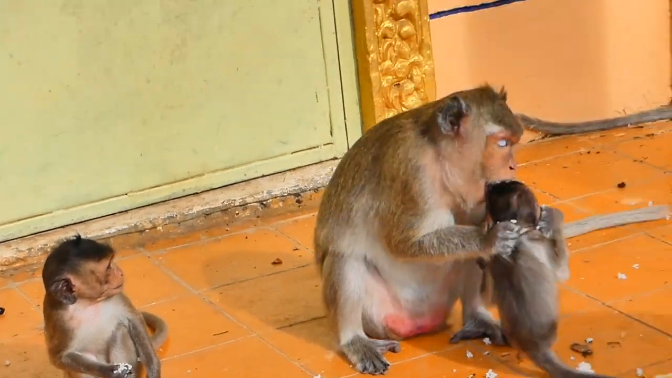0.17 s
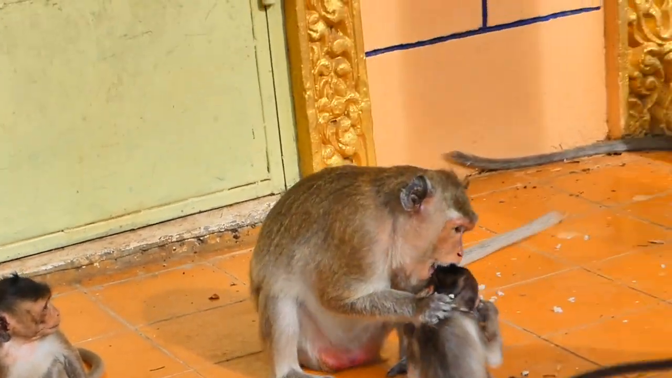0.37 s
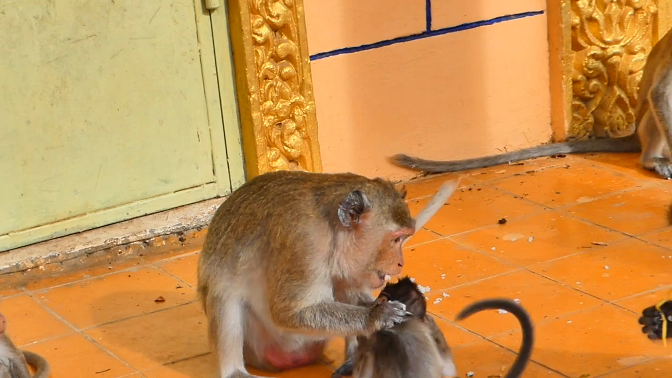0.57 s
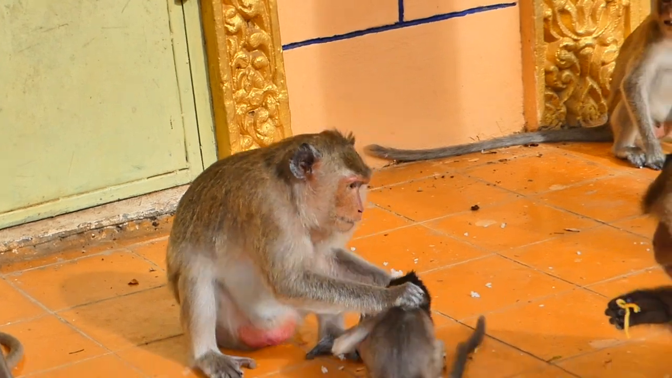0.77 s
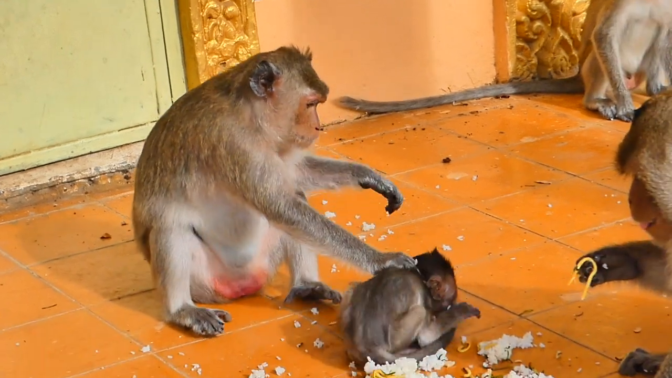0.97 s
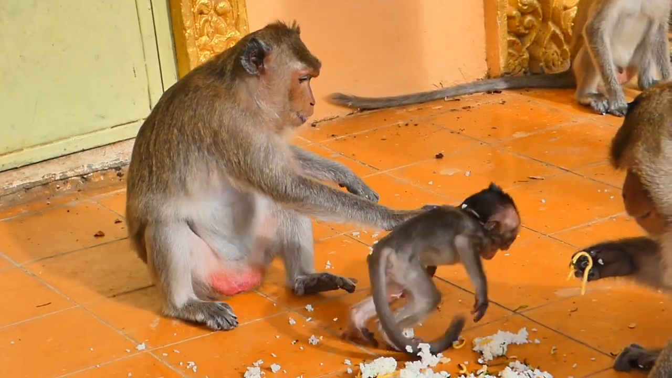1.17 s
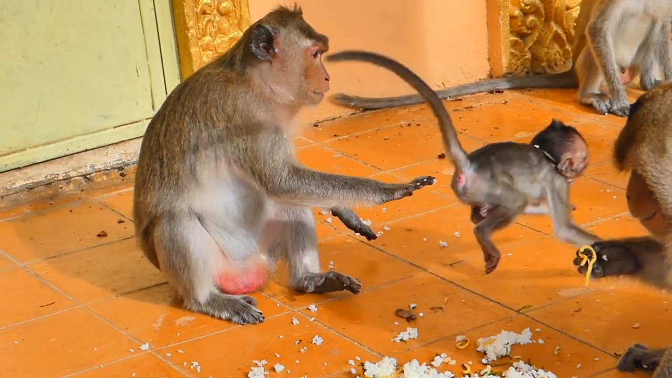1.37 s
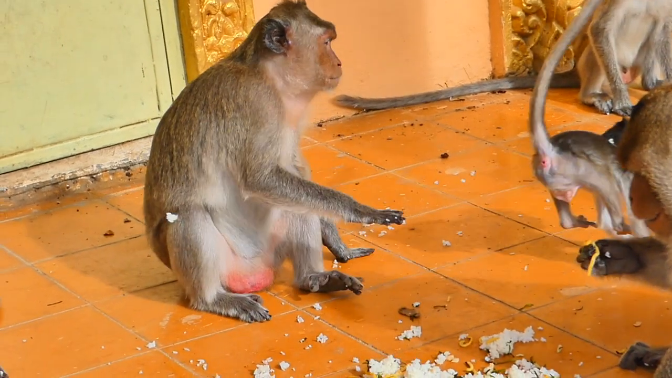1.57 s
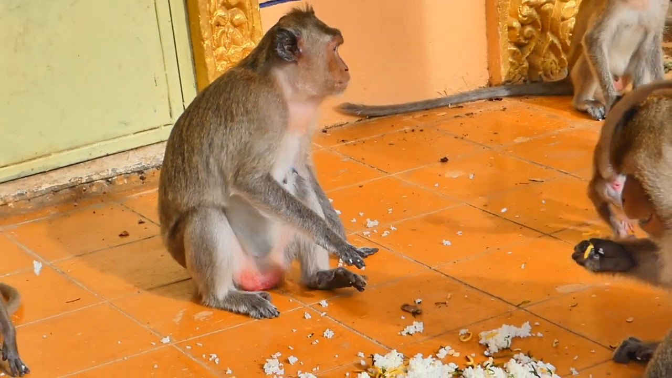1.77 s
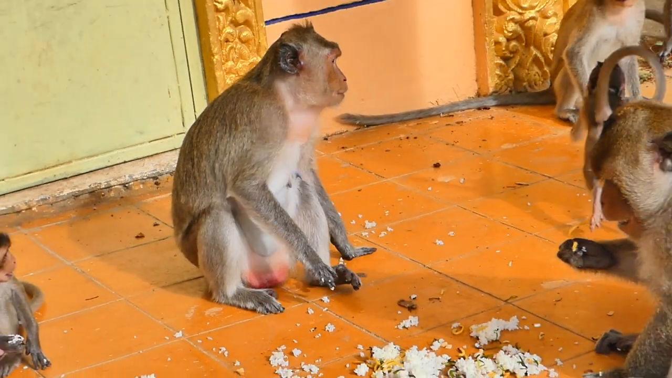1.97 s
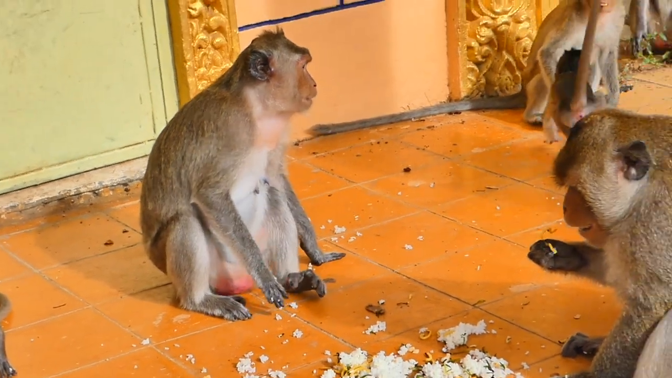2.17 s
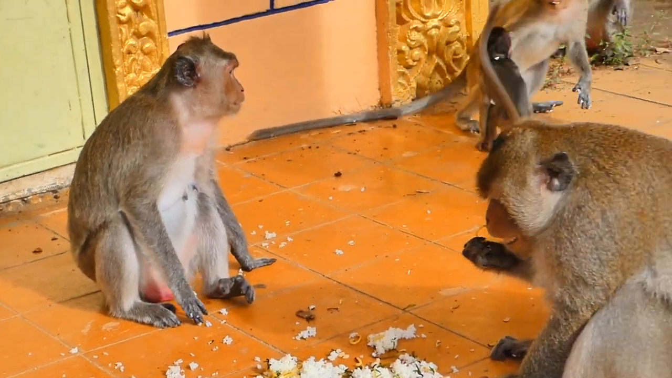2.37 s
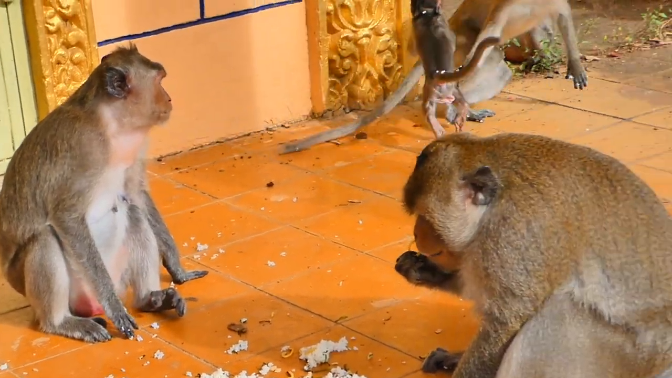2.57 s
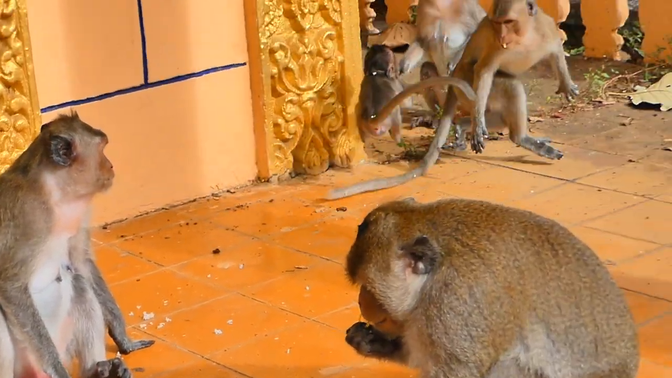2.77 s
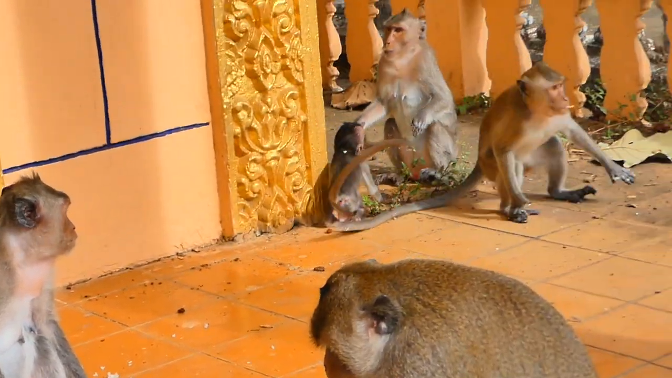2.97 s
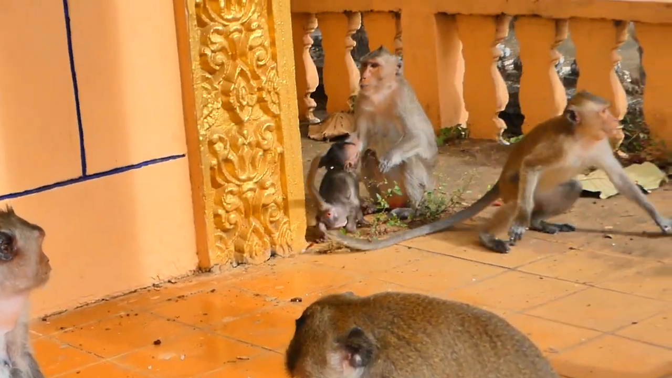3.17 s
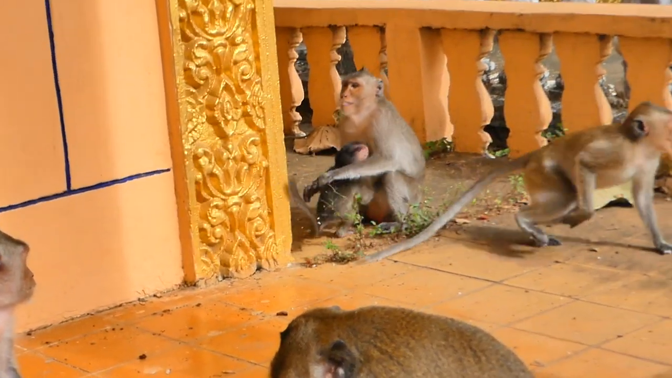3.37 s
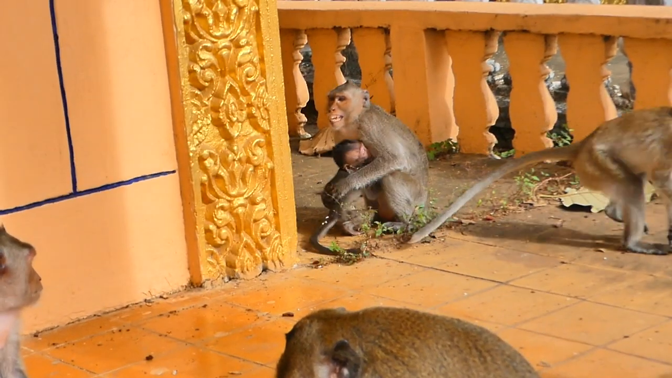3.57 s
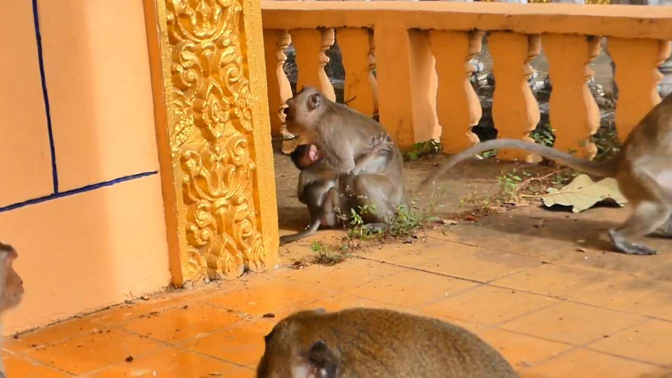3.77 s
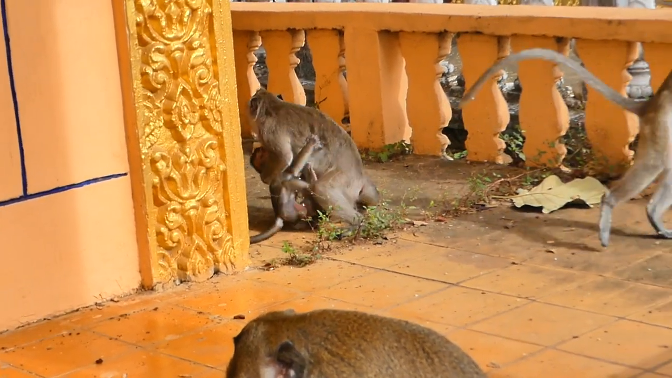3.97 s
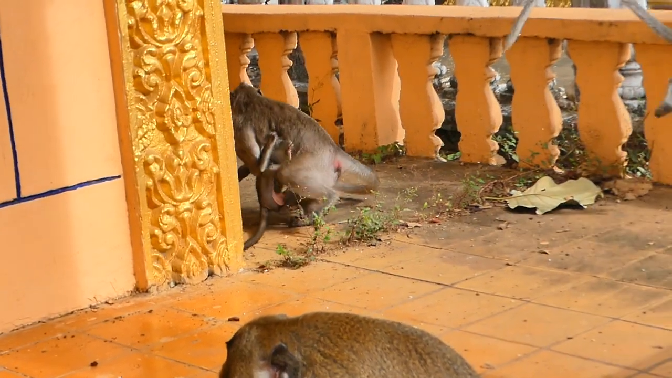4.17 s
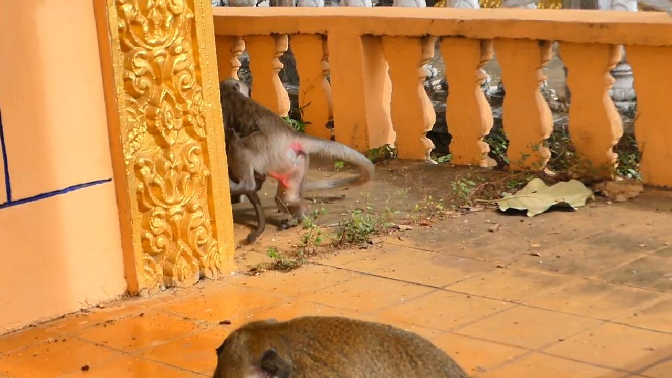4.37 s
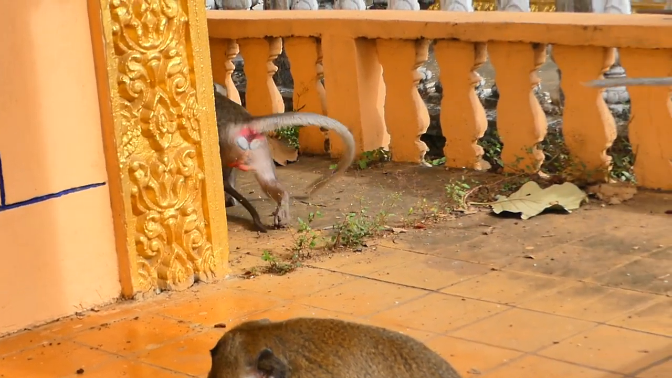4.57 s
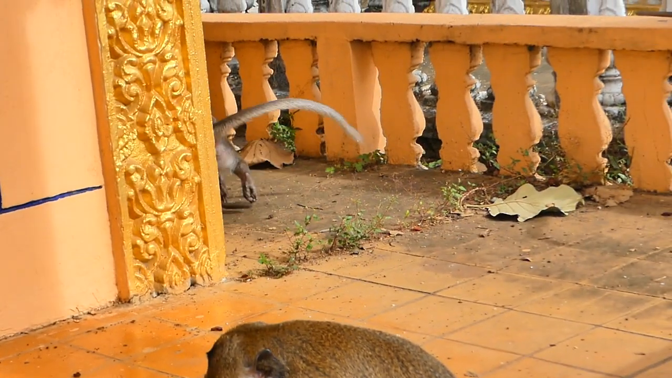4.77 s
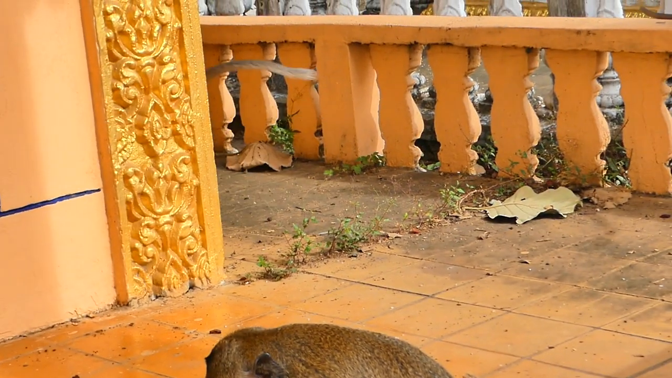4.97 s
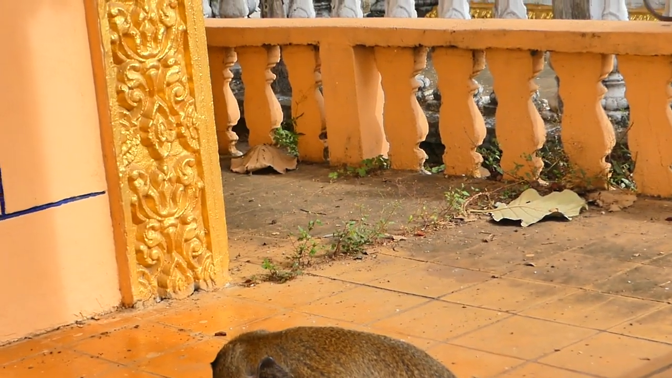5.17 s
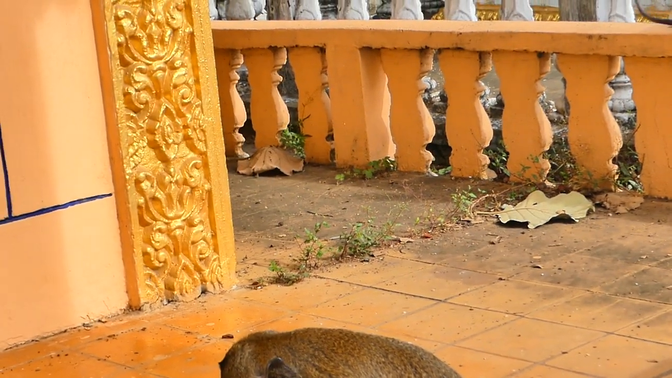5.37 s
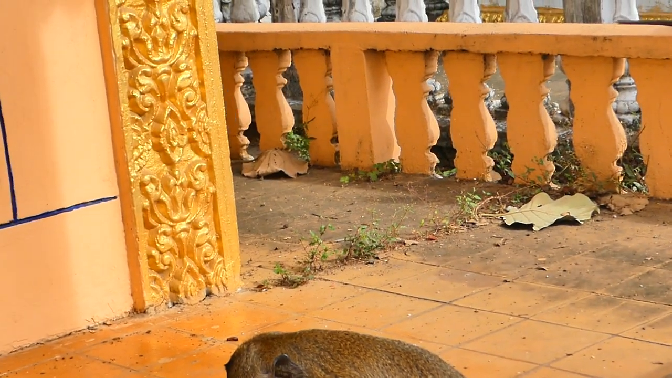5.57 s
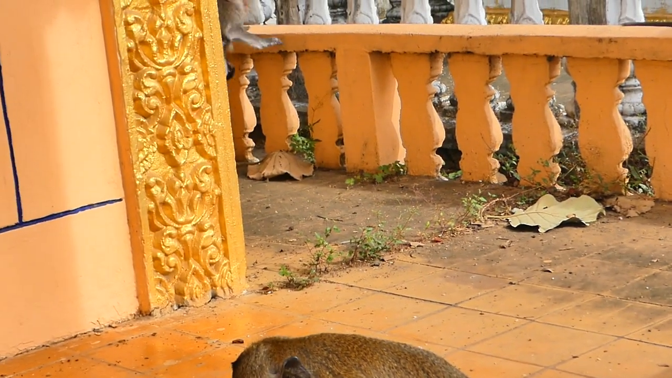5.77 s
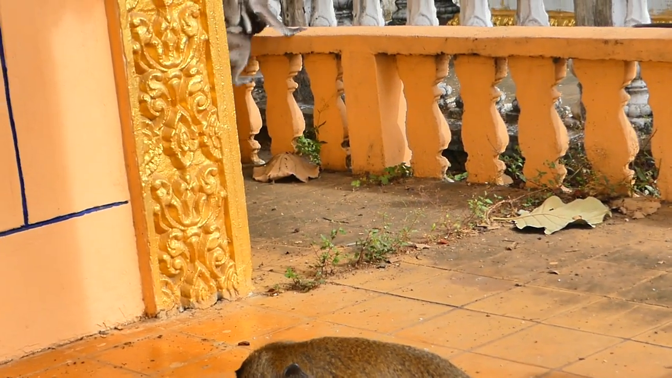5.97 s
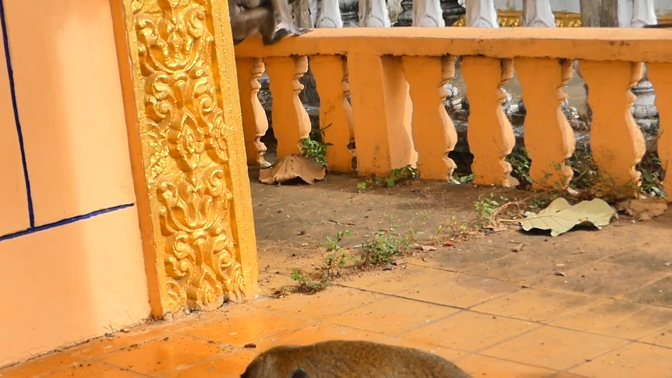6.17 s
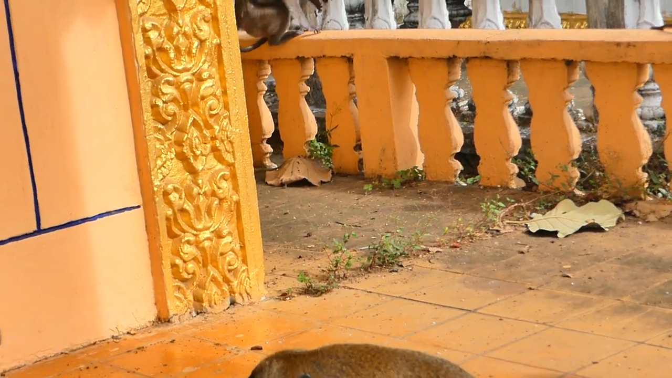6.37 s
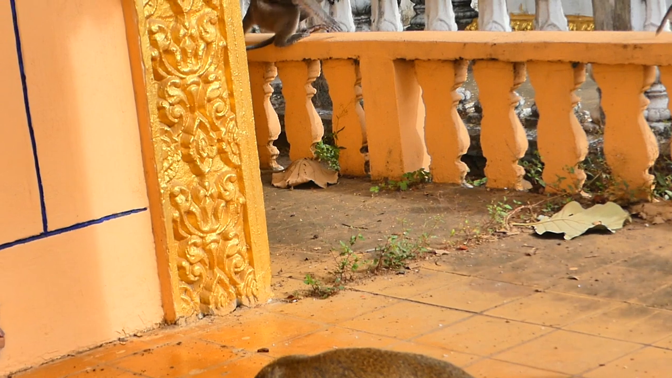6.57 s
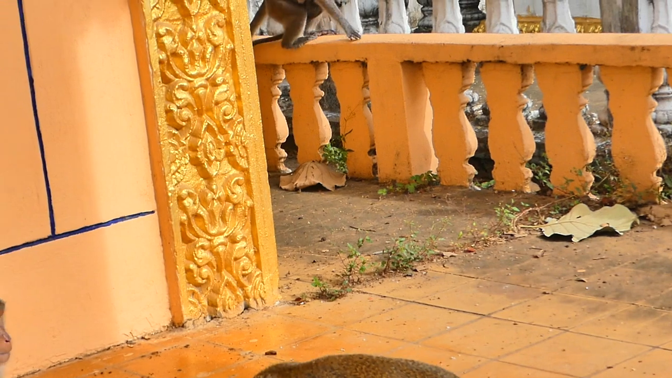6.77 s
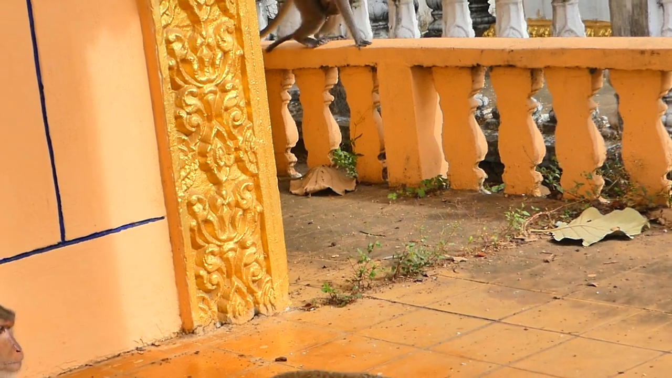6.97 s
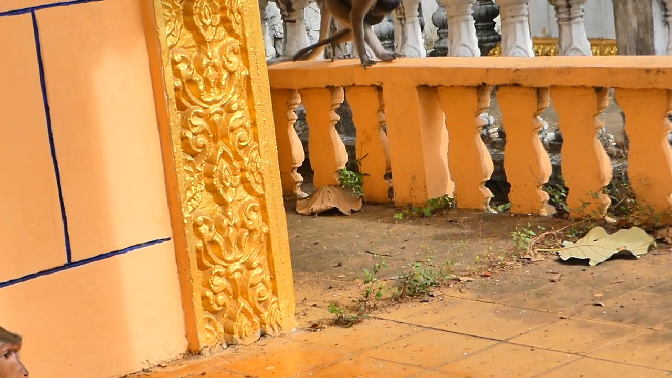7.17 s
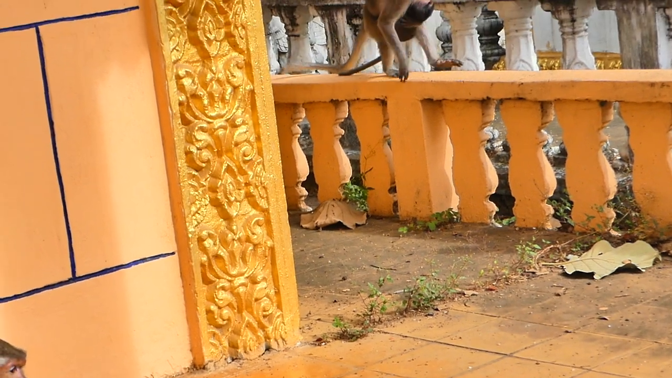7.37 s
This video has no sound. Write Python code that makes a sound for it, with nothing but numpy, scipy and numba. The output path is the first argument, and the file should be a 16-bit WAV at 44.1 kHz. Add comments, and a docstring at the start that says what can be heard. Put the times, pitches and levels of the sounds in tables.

```python
"""A young macaque screams in one long, shrill, harsh stretch that breaks up, as a troop squabbles on a
tiled temple terrace. Short chattering barks follow, then hoarse screams that slide into whistles and
whimpers, and a last shriek. Each cry is air pushed through the vocal folds: blown hard they shake wildly,
blown gently they swing evenly, and the mouth and throat ring along. Walls throw the cries back
over a faint outdoor rumble and one far-off hoot."""
import sys
import numpy as np
from scipy import signal
from scipy.fft import rfft, irfft, next_fast_len
from scipy.io import wavfile
from scipy.ndimage import uniform_filter1d
from numba import njit

SR = 44100
rng = np.random.default_rng(int(sys.argv[2]) if len(sys.argv) > 2 else 0)


def waveform_to_disk(signal):
    """Save audio, clipped to [-1, 1], as 16-bit WAV at the path in sys.argv[1]."""
    frames = np.transpose(np.atleast_2d(signal))
    scaled = np.clip(frames, -1, 1) * 32767
    samples = np.round(scaled).astype(np.int16)
    wavfile.write(sys.argv[1], SR, samples)


N = 327663
TIME = np.arange(N) / SR
SIDES = np.array([[1], [-1]])   # plus for the left ear, minus for the right


def from_db(db):
    """Turn decibels into a number to multiply by."""
    return 10 ** (np.asarray(db) / 20)


def rms_one(x):
    """Scale a sound to an average power of 1."""
    return x / np.sqrt(np.mean(x ** 2) + 1e-20)


def at_hz(points, hz):
    """Read between a table's rows, with octaves evenly spaced."""
    points = np.array(points)
    return np.interp(np.log(np.maximum(hz, 1)), np.log(points[:, 0]), points[:, 1])


def in_time(rows):
    """The samples that a table spans, and its columns at those samples."""
    times, *columns = np.transpose(rows)
    at = np.flatnonzero((TIME >= times[0]) & (TIME <= times[-1]))
    return at, [np.interp(TIME[at], times, column) for column in columns]


def add(out, at, sound):
    """Mix a sound in, fading its ends over 3 ms."""
    edge = np.minimum(np.arange(len(at)), np.arange(len(at))[::-1])
    out[at] += sound * np.minimum(edge / (.003 * SR), 1)


def drift(rate_hz, size):
    """A smooth random wiggle, typically about 1 in size."""
    r = np.exp(-16 * np.pi * rate_hz / SR)
    slow = signal.lfilter([1], [1, -2 * r, r * r], rng.standard_normal(size // 8 + 2000))[1000:]
    return np.interp(np.arange(size) / 8, np.arange(len(slow)), rms_one(slow))


def shaped(x, gain_at):
    """Turn each frequency up or down by gain_at(hz)."""
    size = next_fast_len(N + SR)
    return irfft(rfft(x, size) * gain_at(np.arange(size // 2 + 1) * SR / size), size)[..., :N]


def keep_band(x, low_hz, high_hz):
    """Soften everything outside a range of frequencies."""
    return signal.sosfilt(signal.butter(2, [low_hz, high_hz], "band", fs=SR, output="sos"), x)


def cut_bass(x, hz):
    """Fade out what lies below a frequency."""
    return signal.sosfilt(signal.butter(4, hz, "high", fs=SR, output="sos"), x)


# Tone of the rumble and air, shared by both ears or differing between them: f/Hz, relative level/dB
RUMBLE_SHARED = [(15, -50.5), (25, -20.5), (60, -0.5), (102, -1.5), (139, -1), (177, -2), (334, -7),
                 (368, -6.5), (405, -7), (543, -8.5), (1200, -14), (1560, -34), (2640, -120)]
RUMBLE_SPREAD = [(15, -37), (25, -12), (69, -2.5), (156, -0.5), (249, -1), (334, -4), (368, -1.5),
                 (405, -3), (543, -5), (750, -7), (1200, -13.5), (1560, -49.5), (2640, -120)]
AIR_SHARED = [(600, -24), (1100, -5), (1600, -3.5), (3500, -7.5), (5200, -8.5), (7750, -14.5), (10000, -11),
              (13000, -15.5), (15500, -22)]
AIR_SPREAD = [(650, -36.5), (1100, -6.5), (1740, -7.5), (3000, -17.5), (6000, -21), (10000, -24),
              (15500, -26)]
# Which way the background leans: f/Hz, left minus right/dB
BACKGROUND_LEAN = [(60, -5), (125, -4.5), (250, -0.5), (600, 2.5), (2000, -0.5)]
def background(sway_db=.5):
    """Distant rumble and a thin hiss of air, both very wide."""
    def noise(spectrum, db):
        tinted = shaped(rng.standard_normal(N), lambda hz: from_db(at_hz(spectrum, hz)))
        return from_db(db) * rms_one(tinted)
    shared = noise(RUMBLE_SHARED, db=-68.5) + noise(AIR_SHARED, db=-68.5)
    spread = noise(RUMBLE_SPREAD, db=-61) + noise(AIR_SPREAD, db=-68.5)
    both = shaped(shared + spread * SIDES, lambda hz: from_db(SIDES * at_hz(BACKGROUND_LEAN, hz) / 2))
    return both * from_db(sway_db * drift(24, N))


# The path of the hoot: t/s, pitch/Hz, level/dB
HOOT_PATH = [(3.83, 177, -77), (3.88, 182, -59.5), (3.93, 166, -65), (3.98, 168, -76)]
def hoot():
    """A soft, nearly pure low note far off."""
    out = np.zeros(N)
    at, (pitch_hz, level_db) = in_time(HOOT_PATH)
    add(out, at, from_db(level_db) * rms_one(np.sin(2 * np.pi * np.cumsum(pitch_hz) / SR)))
    return out


# How long the echoes last: f/Hz, time to fade by 60 dB/s
ECHO_FADE = [(1000, 0.32), (2200, 0.37), (4500, 0.24), (8000, .3)]
def terrace(x, early_db=-8.5, early_s=.013, tail_db=-14, build_s=.026):
    """Floor and near walls answer at once; the buildings around add a tail that loses its treble first."""
    t, edges_hz = TIME[:SR], np.geomspace(700, 16000, 8)
    tail = 0
    for low, high in zip(edges_hz, edges_hz[1:]):
        band = keep_band(rng.standard_normal((2, SR)), low, high)
        tail += band * np.exp(-np.log(1000) * t / at_hz(ECHO_FADE, np.sqrt(low * high)))
    tail *= 1 - np.exp(-t / build_s)
    early = rng.standard_normal((2, SR)) * np.exp(-t / early_s) * (t > .001)
    response = (from_db(early_db) * rms_one(early) + from_db(tail_db) * rms_one(tail)) / np.sqrt(SR)
    return signal.fftconvolve(x[None], response, axes=1)[:, :N]


# How much of the echoes' left-right contrast is kept: f/Hz, level/dB
ECHO_SPREAD = [(1200, -1), (2500, -8), (5000, -7), (8000, -2.5)]
# How far the wave on the left runs ahead: f/Hz, phase/rad
LEFT_LEAD = [(1100, 1.26), (1700, 0.73), (2500, 0.52), (4400, .03), (7500, 0.29)]
def microphones(direct, echoes, left_db=3.5, left_db_per_s=-.23):
    """Two close microphones hear similar echoes; the cries start on the left and edge inwards."""
    shared, spread = (echoes[0] + echoes[1]) / 2, (echoes[0] - echoes[1]) / 2
    both = direct + shared + SIDES * shaped(spread, lambda hz: from_db(at_hz(ECHO_SPREAD, hz)))
    both = shaped(both, lambda hz: np.exp(.5j * SIDES * at_hz(LEFT_LEAD, hz)))
    return both * from_db(SIDES * (left_db + left_db_per_s * TIME) / 2)


def breath(start, length, attack_s, release_s, arch_db):
    """One breath of sound swells, arches and dies: its samples, its progress 0-1 and its level in dB."""
    at = np.flatnonzero((TIME > start) & (TIME < start + length + 5 * release_s))
    t = TIME[at] - start
    progress = np.minimum(t / length, 1)
    gain = (1 - np.exp(-t / attack_s)) * np.exp(-np.maximum(t - length, 0) / release_s)
    return at, progress, 20 * np.log10(gain + 1e-9) - arch_db * (2 * progress - 1) ** 2


# Whimpers: t/s, length/s, level/dB, first pitch/Hz, last pitch/Hz, roughness/0-1, brightness/dB per octave
WHIMPER_CRIES = [(5.594, .16, -62, 1464, 1715, .65, 8), (5.746, .07, -54, 1830, 1986, .4, 4),
                 (6.303, 0.053, -61, 860, 885, 0.11, 5), (6.349, .07, -57, 905, 990, 0.42, 1),
                 (6.686, .072, -57.5, 945, 828, .12, 14), (6.758, 0.038, -58.5, 1610, 1632, 0.15, 19),
                 (6.856, 0.025, -67.5, 1787, 1714, 0.14, 3)]
# How the mouth colours a whimper: f/Hz, level/dB
WHIMPER_TONE = [(800, -8), (1200, -7), (1700, 8.5), (2600, -7.5), (3400, -3.5), (4600, -13.5),
                (6500, -23.5), (8200, -34), (14000, -68)]
def whimpers(jitter=.12, shimmer_db=7):
    """With less pressure the vocal folds swing regularly and give a stack of overtones."""
    out = np.zeros(N)
    for start, length, level_db, first_hz, last_hz, rough, bright_db in WHIMPER_CRIES:
        at, progress, shape_db = breath(start, length, attack_s=.005, release_s=.0051, arch_db=-.5)
        pitch_hz = first_hz + (last_hz - first_hz) * progress
        phase = 2 * np.pi * np.cumsum(pitch_hz * (1 + jitter * rough * drift(217, len(at)))) / SR
        tone = 0
        for k in range(1, 9):
            overtone_db = at_hz(WHIMPER_TONE, k * pitch_hz) + bright_db * np.log2(min(k, 3))
            tone += from_db(overtone_db) * np.sin(k * phase)
        flicker_db = shimmer_db * rough * np.minimum(drift(130, len(at)), 1.3)
        add(out, at, rms_one(tone) * from_db(level_db + shape_db + flicker_db))
    return out


# A whistle sinking through the shrill screams, and a squeal arching through the second hoarse one:
# t/s, pitch/Hz, level/dB, roughness/0-1
SINKING_WHISTLE = [(.07, 5200, -49, .15), (.17, 4874, -47, .15), (.23, 4430, -47, 0.28),
                   (.3, 4944, -62, .3), (1.0, 5044, -47.5, .45), (1.1, 4600, -48.5, .45),
                   (1.23, 5070, -45, .4), (1.5, 4510, -59.5, 0.4), (2.45, 4500, -54, .4),
                   (2.59, 4427, -57, .15), (2.7, 4300, -61, .13), (2.97, 4190, -61.5, .2),
                   (3.11, 4410, -52.5, .25), (3.19, 3806, -59.5, 0.1), (3.35, 3805, -63.5, .45),
                   (3.48, 3580, -58, .4)]
SQUEAL = [(5.8, 2620, -56, 0.63), (5.9, 3385, -57, 0.72), (6.01, 3293, -58.5, 0.83),
          (6.07, 2734, -50.5, .55), (6.12, 2486, -63.5, .3), (6.22, 2470, -72.5, .25)]
# Short whistled cries: t/s, length/s, level/dB, first pitch/Hz, last pitch/Hz, roughness/0-1
SHORT_WHISTLES = [(0.0, 0.0091, -29, 7790, 8230, 0.02), (.033, 0.018, -32, 7700, 7490, 0.17),
                  (0.527, 0.083, -49, 2720, 3020, 0.32), (1.424, .23, -49.5, 2660, 2367, 0.59),
                  (2.12, .07, -57, 2994, 2830, 0.1), (2.263, 0.17, -53.5, 2350, 1797, 0.58),
                  (2.878, .05, -53, 2200, 2390, 0.3), (3.26, .05, -57.5, 7830, 7700, 0.08),
                  (3.36, 0.085, -57, 7460, 7580, 0.21), (3.427, 0.049, -55, 1384, 1457, .35),
                  (3.631, 0.054, -54, 5650, 5450, .3), (3.693, 0.028, -58, 4950, 4900, 0.3),
                  (5.221, .33, -62.5, 2120, 1980, .45), (6.409, .09, -58.5, 2220, 2640, .6),
                  (6.492, 0.021, -52.5, 2660, 2644, 0.02), (6.603, .056, -49.5, 2192, 1643, 0.42)]
def whistles(jitter=.085, waver=.035, shimmer_db=6, flutter_db=1.0, octave_db=-20):
    """Tightly stretched vocal folds give one strong note that wavers and frays as it gets rough."""
    out = np.zeros(N)
    controls = [in_time(SINKING_WHISTLE), in_time(SQUEAL)]
    for start, length, level_db, first_hz, last_hz, rough in SHORT_WHISTLES:
        at, progress, shape_db = breath(start, length, attack_s=.0024, release_s=.016, arch_db=3.5)
        controls.append((at, (first_hz + (last_hz - first_hz) * progress, level_db + shape_db, rough)))
    for at, (pitch_hz, level_db, rough) in controls:
        size = len(at)
        bend = 1 + rough * (jitter * drift(220, size) + waver * drift(30, size))
        phase = 2 * np.pi * np.cumsum(pitch_hz * bend) / SR
        tone = rms_one(np.sin(phase) + from_db(octave_db) * np.sin(2 * phase))
        flicker_db = shimmer_db * rough * np.minimum(drift(150, size), 1.3) + flutter_db * drift(39, size)
        add(out, at, tone * rms_one(from_db(flicker_db)) * from_db(level_db))
    return out


def folds(pitch_hz, jitter, hiss, size):
    """Vocal folds: an unevenly timed puff at each closure, with hiss that pulses along."""
    turns = np.cumsum(pitch_hz * np.exp(jitter * drift(500, size))) / SR
    puffs = sum(np.cos(2 * np.pi * k * turns) for k in range(1, 10))
    return rms_one(puffs) + hiss * rng.standard_normal(size) * (1 + np.cos(2 * np.pi * turns))


@njit
def resonate(x, hz, width_hz):
    """A resonance: it rings at a moving frequency and lets nearby ones through."""
    angle, r = 2 * np.pi * hz / SR, np.exp(-np.pi * width_hz / SR)
    y = np.zeros(len(x))
    for i in range(2, len(x)):
        ringing = 2 * r * np.cos(angle[i]) * y[i - 1] - r * r * y[i - 2]
        y[i] = (1 - r * r) / 2 * (x[i] - x[i - 2]) + ringing
    return y


def airway_ring(source, hz, width_hz, wobble):
    """One steep resonance of the mouth and throat, trembling with the strain."""
    centre_hz = hz * (1 + wobble * drift(53, len(source)))
    return rms_one(resonate(resonate(source, centre_hz, width_hz), centre_hz, width_hz))


# How the shriek swells: t/s, level/dB
SHRIEK_SWELL = [(7.36, -60), (7.376, -50.5), (7.405, -50), (7.43, -58)]
# Its resonances: f/Hz, width/Hz, level/dB
SHRIEK_RINGS = [(3100, 470, -5), (4030, 1100, -3), (5000, 1000, -6), (6630, 1100, -8.5), (9500, 5000, -6),
                (12000, 1500, -17), (14400, 1000, -22)]
def shriek():
    """Hissing folds and high resonances make a sudden, very bright rough cry."""
    out = np.zeros(N)
    at, (level_db,) = in_time(SHRIEK_SWELL)
    source = folds(pitch_hz=1030, jitter=.06, hiss=.91, size=len(at))
    voice = sum(from_db(db) * airway_ring(source, hz, width, wobble=.074) for hz, width, db in SHRIEK_RINGS)
    add(out, at, voice * from_db(level_db))
    return cut_bass(out, hz=2200)


# Barks: t/s, length/s, level/dB, pitch/Hz, lowest resonance at start/Hz, at end/Hz, brightness/dB per octave
BARK_RUN = [(4.139, 0.064, -43.5, 1102, 2250, 1850, -2.5), (4.245, 0.086, -38.5, 905, 2200, 1710, -4),
            (4.366, 0.11, -40.5, 914, 2370, 1750, -7), (4.514, 0.11, -43.5, 898, 2400, 1720, -6),
            (4.666, 0.11, -47, 882, 2200, 1640, -1), (4.824, 0.043, -51.5, 1079, 2200, 2000, -12)]
# Their resonances, before the mouth moves them: f/Hz, width/Hz, level/dB
BARK_RINGS = [(2100, 690, 3), (3020, 350, -10), (3465, 230, -6.5), (4800, 2300, -4.5), (6730, 980, -13.5)]
# How a bark swells: progress/0-1, level/dB
BARK_SWELL = [(0, -11.5), (.17, -5), (.35, -3), (.8, -3), (1, -4.5)]
def barks(release_s=.021, wobble=.05, rasp_db=1.5, rasp_hz=170, dulling_db=5):
    """Each bark starts as a note, then breaks into a rattle while the mouth closes: it falls and dulls."""
    out = np.zeros(N)
    lowest_hz = BARK_RINGS[0][0]
    for start, length, level_db, pitch_hz, first_hz, last_hz, bright_db in BARK_RUN:
        at, (progress,) = in_time([(start, 0), (start + length, 1), (start + length + 3 * release_s, 1)])
        rattle = np.clip((progress - .17) / .201, 0, 1)
        source = folds(pitch_hz, jitter=.0201 + .18 * rattle, hiss=.65 + .16 * rattle, size=len(at))
        closing = (first_hz + (last_hz - first_hz) * progress) / lowest_hz
        tilt_db = bright_db + dulling_db * (.5 - progress)
        voice = 0
        for k, (hz, width_hz, db) in enumerate(BARK_RINGS):
            gain = from_db(db + tilt_db * np.log2(hz / lowest_hz))
            moved_hz = hz * closing ** (1 / (1 + 2 * k))   # higher resonances move less
            voice += (-1) ** k * gain * airway_ring(source, moved_hz, width_hz, wobble)
        voice /= np.sqrt(uniform_filter1d(voice ** 2, size=900) + 1e-12)   # even out the level
        voice = rms_one(voice * from_db(rasp_db * rattle * np.minimum(drift(rasp_hz, len(at)), 1.5)))
        release = np.exp(-np.maximum(TIME[at] - start - length, 0) / release_s)
        swell_db = np.interp(progress, *np.transpose(BARK_SWELL))
        add(out, at, voice * release * from_db(level_db + swell_db))
    return cut_bass(cut_bass(out, hz=1280), hz=1280)


def stray_tones(size, wander_hz=150, flicker_db=4.0):
    """Wildly shaking folds scatter their power into extra tones, each wandering and fading on its own."""
    out = 0
    for hz in np.linspace(1300, 8200, 28):
        phase = 2 * np.pi * (np.cumsum(hz + wander_hz * drift(34, size)) / SR + rng.random())
        out += np.sin(phase) * from_db(flicker_db * np.minimum(drift(22, size), 1.7))
    return rms_one(out)


def screams(controls, rings, pitch_hz, jitter, hiss, stray_db, wobble, rasp_db, rasp_hz, rush_db):
    """Overblown folds shake wildly and drive five resonances; a dull rush of air lies below them."""
    out = np.zeros(N)
    for at, level_db, low_db, top_db, mouth_hz, throat_hz in controls:
        size = len(at)
        pulses = rms_one(folds(pitch_hz * np.exp(.15 * drift(12, size)), jitter, hiss, size))
        source = pulses + from_db(stray_db) * stray_tones(size)
        moving_hz = {0: mouth_hz, 2: throat_hz}   # these replace the first and third frequencies
        boosts_db = [low_db, low_db, 0, 0, top_db]
        voice = 0
        for k, (hz, width_hz, db) in enumerate(rings):
            ring = airway_ring(source, moving_hz.get(k, hz), width_hz, wobble)
            ring /= np.sqrt(uniform_filter1d(ring ** 2, size=1100) + 1e-9)   # steady lungs hold the level
            voice += (-1) ** k * from_db(db + boosts_db[k]) * ring   # neighbours swing opposite ways
        voice = cut_bass(voice, hz=1400)   # so small an animal gives off little bass
        voice += from_db(rush_db) * rms_one(keep_band(rng.standard_normal(size), 250, 1700))
        add(out, at, voice * from_db(level_db + rasp_db * drift(rasp_hz, size)))
    return out


def scream_breaths(rows, attack_s, release_s, arch_db, dulling):
    """Controls for separate screams: each is loudest and brightest in its middle."""
    controls = []
    for start, length, level_db, low_db, top_db, mouth_hz, throat_hz in rows:
        at, progress, shape_db = breath(start, length, attack_s, release_s, arch_db)
        dull_db = dulling * arch_db * (2 * progress - 1) ** 2
        controls.append((at, level_db + shape_db, low_db + dull_db, top_db - dull_db, mouth_hz, throat_hz))
    return controls


# Hoarse screams: t/s, length/s, level/dB, low boost/dB, top boost/dB, mouth ring/Hz, throat ring/Hz
HOARSE_CRIES = [(5.175, 0.22, -57, 0.5, -5, 2060, 4660), (5.775, 0.24, -60, -3.5, -2, 2070, 4760),
                (6.355, 0.14, -72, 7.5, -14, 1710, 4970), (6.61, 0.056, -68, 4.5, -12, 1980, 4750)]
# Their resonances: f/Hz, width/Hz, level/dB
HOARSE_RINGS = [(2000, 620, 2.5), (3180, 1800, -2), (4860, 1060, 2), (6060, 1100, -3.5), (7040, 1270, 1)]
def hoarse_screams():
    """Slower folds and more rushing air make lower, breathy screams."""
    controls = scream_breaths(HOARSE_CRIES, attack_s=.015, release_s=.03, arch_db=2.5, dulling=.47)
    return screams(controls, HOARSE_RINGS, pitch_hz=999, jitter=.22, hiss=.4, stray_db=2.5,
                   wobble=.017, rasp_db=-1.7, rasp_hz=130, rush_db=-11)


# Short shrill screams: t/s, length/s, level/dB, low boost/dB, top boost/dB, mouth ring/Hz, throat ring/Hz
BROKEN_CRIES = [(0.0, 0.062, -45, -3, 8, 2410, 4540), (2.785, 0.27, -58, 1, -1.5, 2310, 4400),
                (2.955, 0.26, -53, -1, 4, 2260, 4770), (3.19, 0.21, -62, 0, 3.5, 2040, 4900),
                (3.325, 0.052, -52.5, -1, -3, 2000, 5150), (3.405, 0.076, -54, -11.5, 0, 2190, 5350),
                (3.528, 0.098, -56, 3.5, 6, 2050, 4800), (3.628, 0.084, -50.5, 0.5, 0, 2090, 5360)]
# Their resonances: f/Hz, width/Hz, level/dB
BROKEN_RINGS = [(2196, 930, -4.5), (3330, 2100, -12.5), (4600, 2040, -4), (6200, 1300, -7),
                (7350, 730, -5.5)]
def broken_screams():
    """The shrill voice comes in sudden bursts, one before the long scream and the rest after it."""
    controls = scream_breaths(BROKEN_CRIES, attack_s=.0021, release_s=.012, arch_db=6, dulling=.15)
    return screams(controls, BROKEN_RINGS, pitch_hz=1375, jitter=.23, hiss=.34, stray_db=1.5,
                   wobble=.018, rasp_db=1.5, rasp_hz=110, rush_db=-15.5)


def hollow(x, start_hz=4250, sag_hz_per_s=330, width_hz=550, depth=.6):
    """Cancelling a sinking band carves a gap between the mouth and throat resonances."""
    return x - depth * resonate(x, start_hz - sag_hz_per_s * TIME, width_hz)


# The effort behind the long scream: t/s, level/dB, low boost/dB, top boost/dB
SCREAM_EFFORT = [(0.05, -56.5, -2, 10), (0.06, -37.5, -11, -3), (0.18, -44, -12, -12.5),
                 (0.21, -40, -12, -5.5), (0.48, -39.5, -10, -6), (0.56, -40.5, -6.5, 1.5),
                 (0.7, -43, -7, -2), (0.77, -43, -6, -3.5), (0.98, -42.5, -7.5, -3), (1.05, -48, -5, -3.5),
                 (1.23, -44.5, -5, -3), (1.52, -45.5, -5, -2.5), (1.7, -47.5, -4.5, -0.5),
                 (1.79, -50.5, -2, -6), (1.92, -46.5, -5, -2.5), (2.13, -52.5, 2, 4), (2.32, -46, -2, -1.5),
                 (2.37, -44.5, -9, 3.5), (2.42, -44, -10, -3.5), (2.55, -40.5, -5.5, -2.5),
                 (2.56, -42, -10.5, -2.5), (2.62, -57.5, 3, -11), (2.66, -68, -16, -19)]
# Its resonances at average effort: f/Hz, width/Hz, level/dB
SHRILL_RINGS = [(2410, 1030, -1.5), (3150, 860, -7), (4560, 2130, -3), (6130, 1500, -6), (7220, 870, 0.5)]
def long_scream(slack_db=6, trim_db=-1, mouth_hz_per_db=-58.5, throat_hz_per_db=35):
    """The young macaque's effort sets the level and pushes the mouth and throat resonances apart."""
    at, (level_db, low_db, top_db) = in_time(SCREAM_EFFORT)
    strain_db = np.maximum(level_db - level_db.mean(), -slack_db)
    mouth_hz = SHRILL_RINGS[0][0] + mouth_hz_per_db * strain_db
    throat_hz = SHRILL_RINGS[2][0] + throat_hz_per_db * strain_db
    controls = [(at, level_db + trim_db, low_db, top_db, mouth_hz, throat_hz)]
    return hollow(screams(controls, SHRILL_RINGS, pitch_hz=1500, jitter=.3, hiss=.56, stray_db=3.5,
                          wobble=.024, rasp_db=.93, rasp_hz=130, rush_db=-23.5))


def scene(echo_db=3.5, echo_db_per_s=.7546):
    """The cries come from a little left of centre; their echoes gain as the macaques move off."""
    cries = long_scream() + broken_screams() + hoarse_screams()
    cries += barks() + shriek() + whistles() + whimpers()
    echoes = terrace(cries * from_db(echo_db + echo_db_per_s * TIME))
    return microphones(cries, echoes) + hoot() + background()


def record(dry, narrow_hz=7950, top_hz=15650, opens_s=6.755, bass_cut_hz=115, leak_db=-63.5):
    """The top is cut hard; near the end the treble opens and the bass thins."""
    def cut_treble(x, edge_hz):
        return shaped(x, lambda hz: 1 / np.sqrt(1 + (hz / edge_hz) ** 200))
    narrow = cut_treble(dry, narrow_hz) + from_db(leak_db) * dry
    opened = np.clip((TIME - opens_s) / .01, 0, 1)
    return cut_treble((1 - opened) * narrow + opened * cut_bass(dry, bass_cut_hz), top_hz)


dry = scene()
out = record(dry)
waveform_to_disk(out)
```